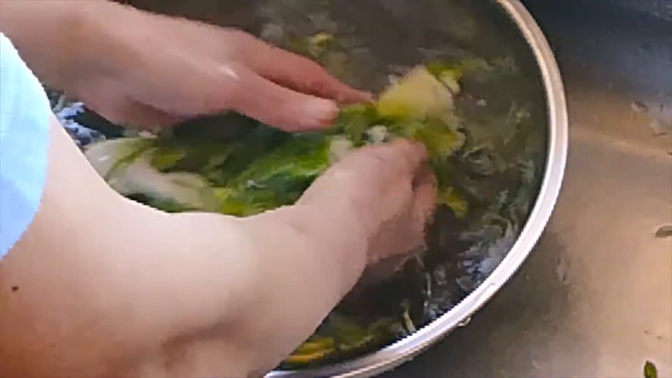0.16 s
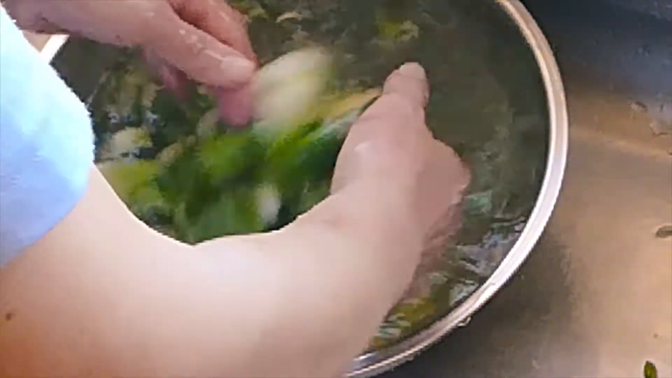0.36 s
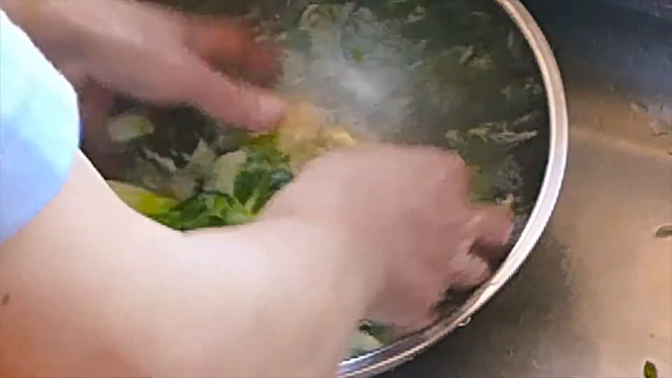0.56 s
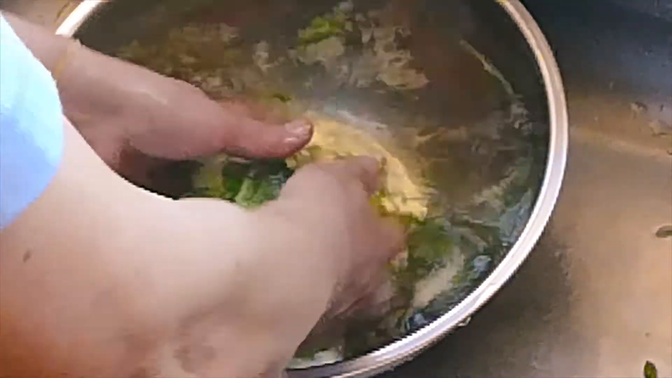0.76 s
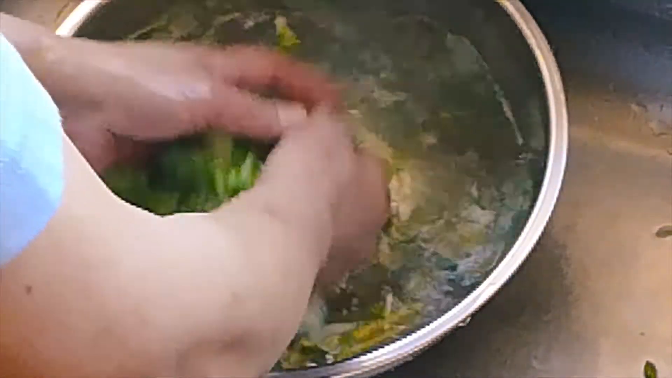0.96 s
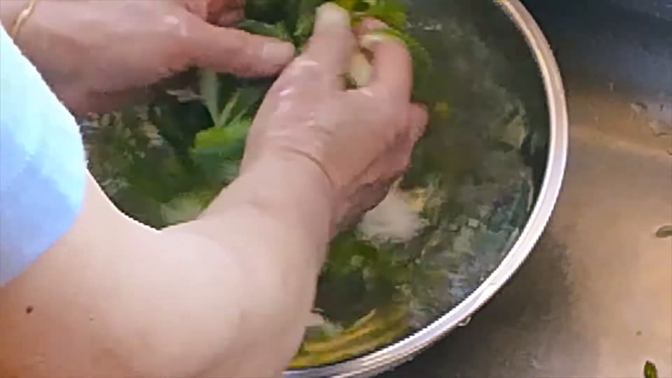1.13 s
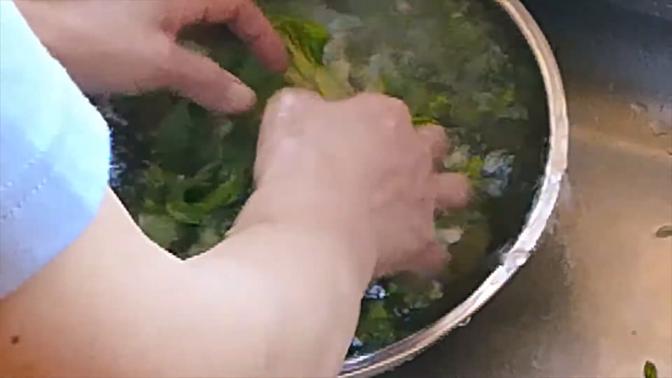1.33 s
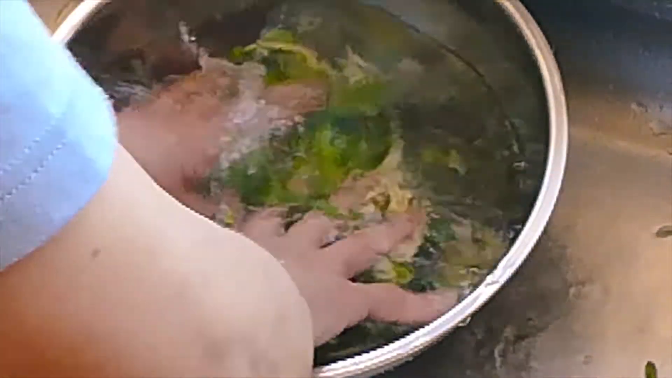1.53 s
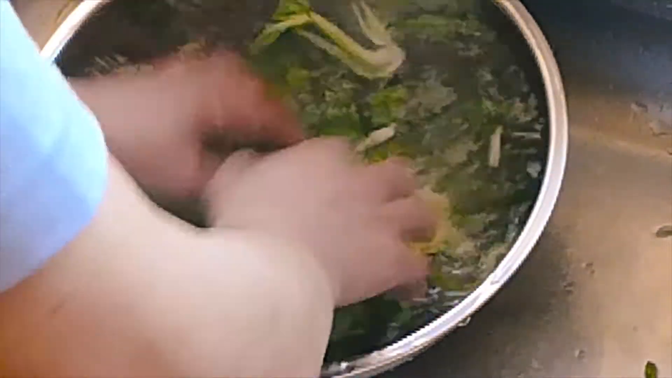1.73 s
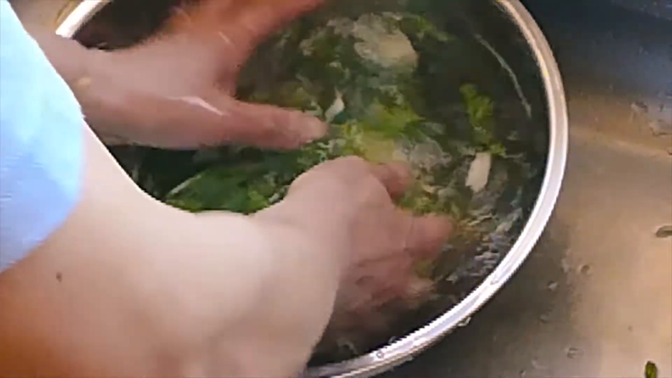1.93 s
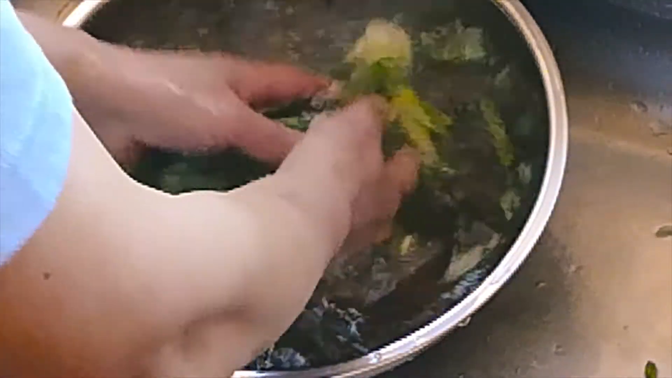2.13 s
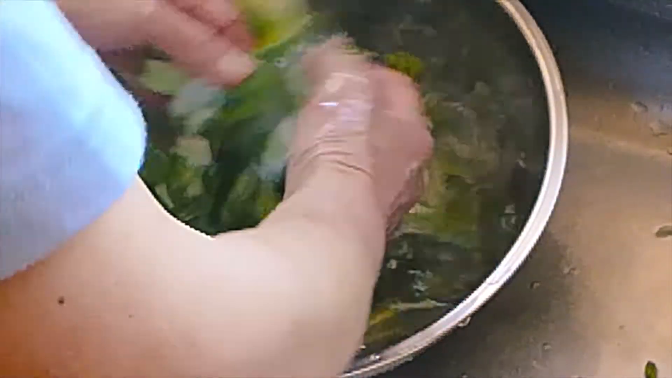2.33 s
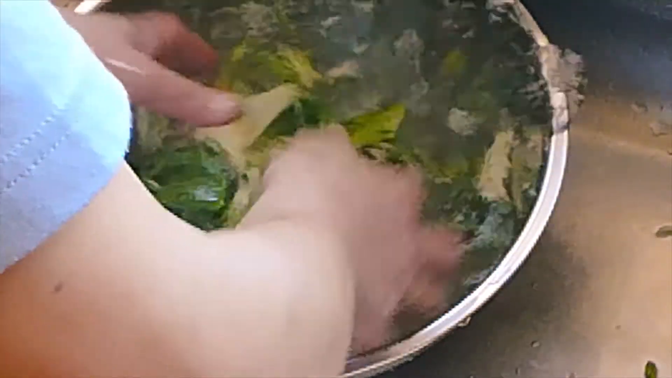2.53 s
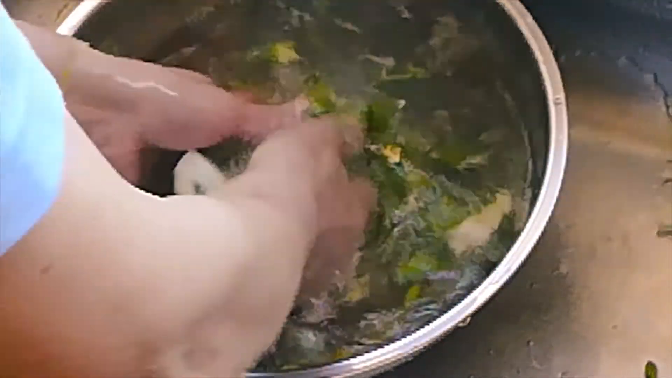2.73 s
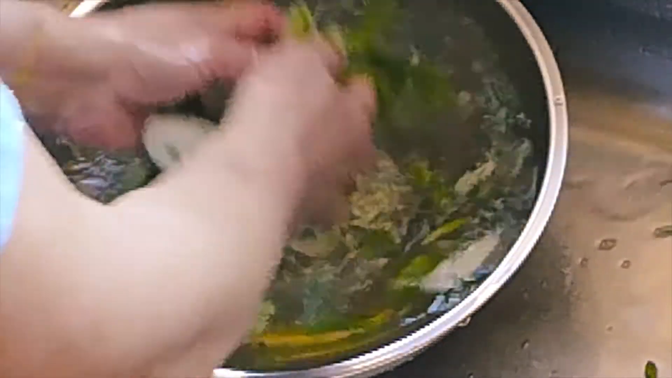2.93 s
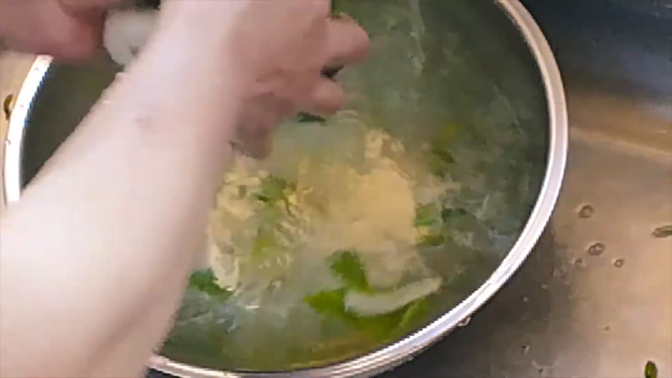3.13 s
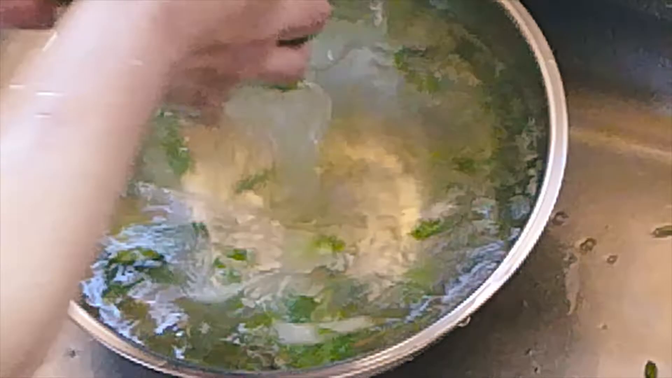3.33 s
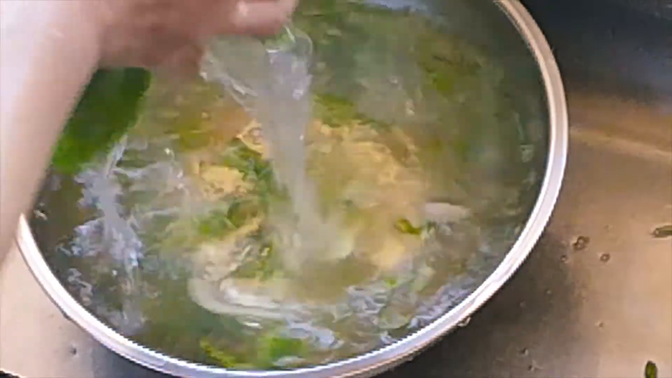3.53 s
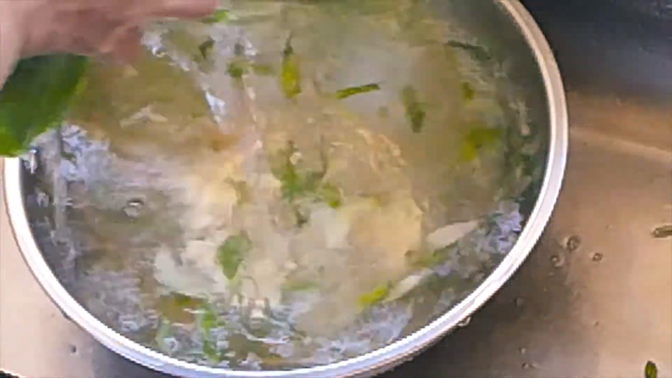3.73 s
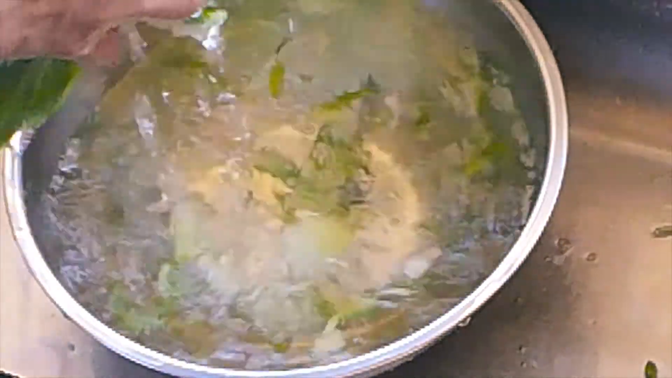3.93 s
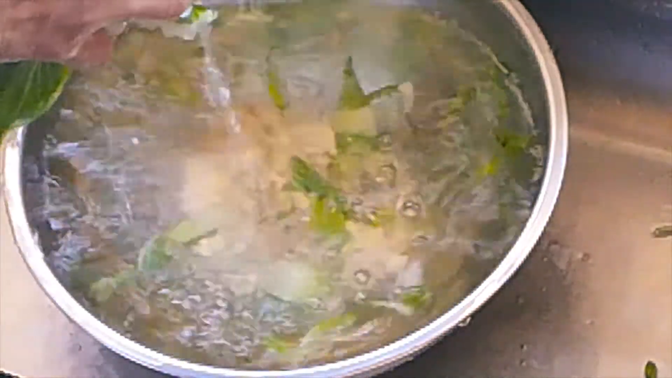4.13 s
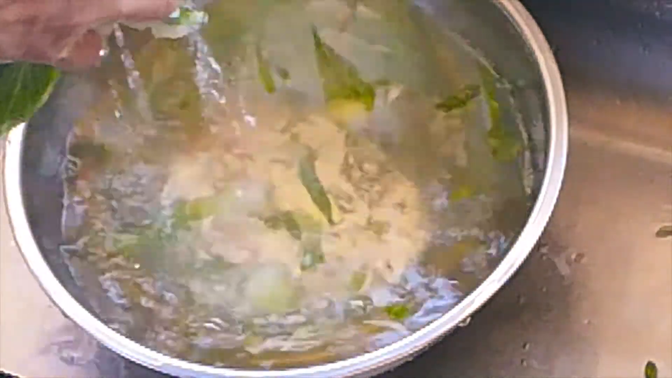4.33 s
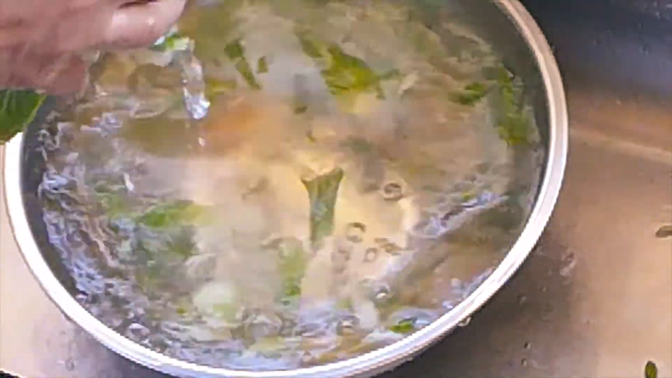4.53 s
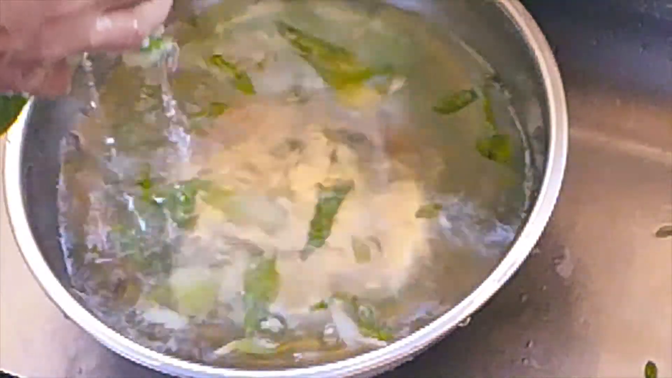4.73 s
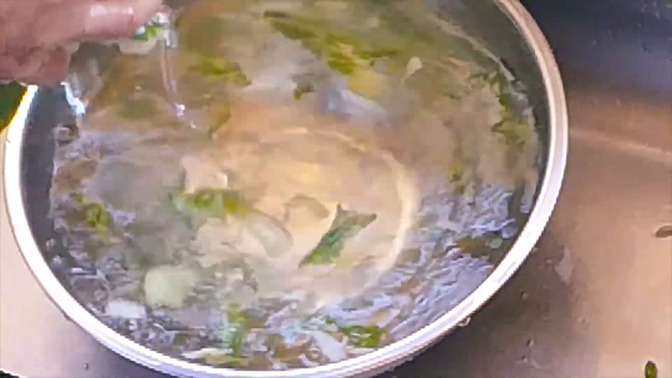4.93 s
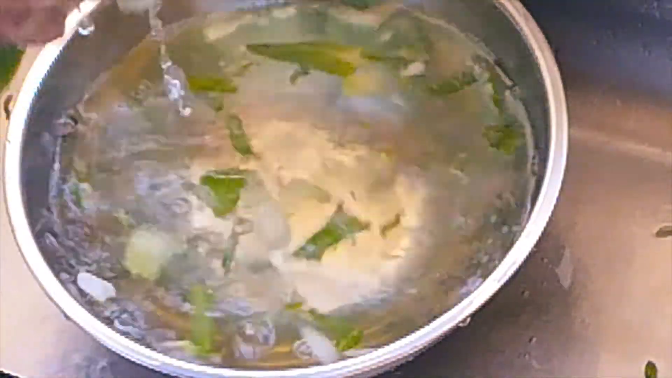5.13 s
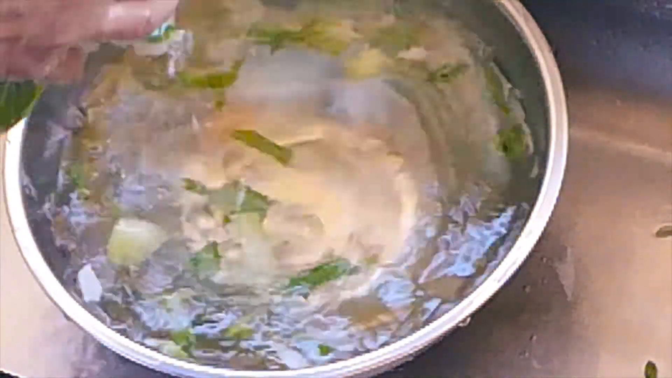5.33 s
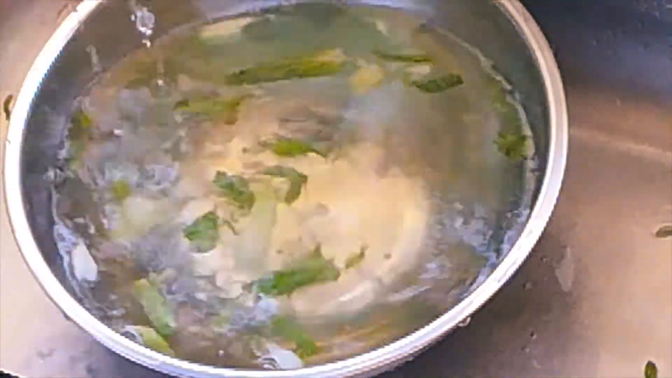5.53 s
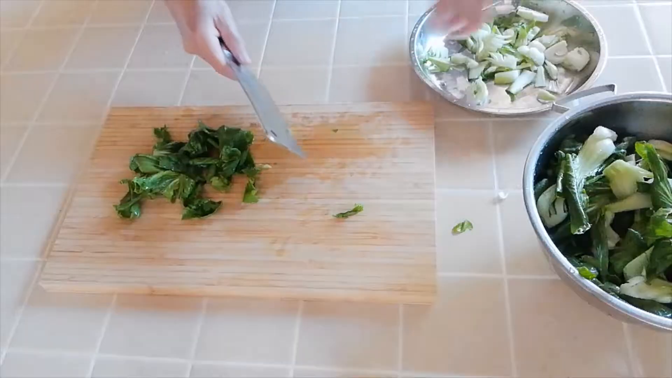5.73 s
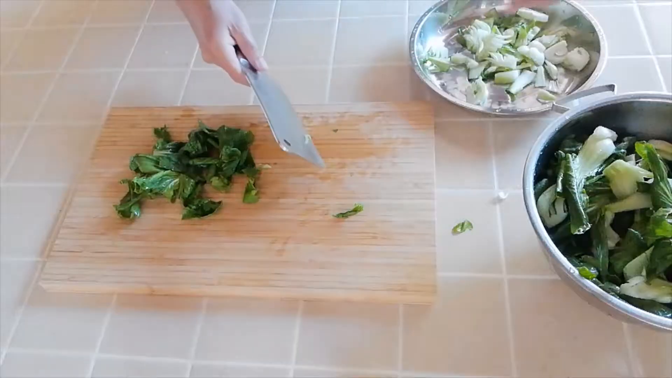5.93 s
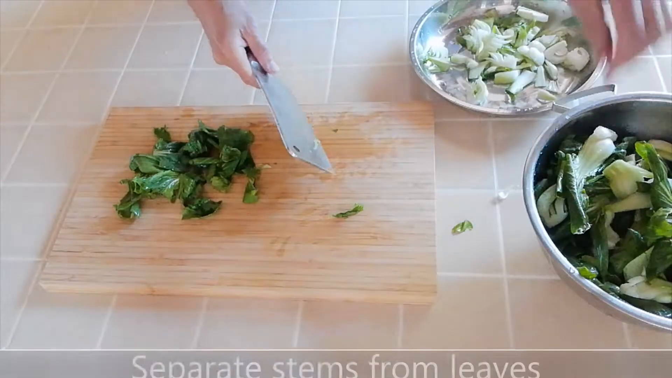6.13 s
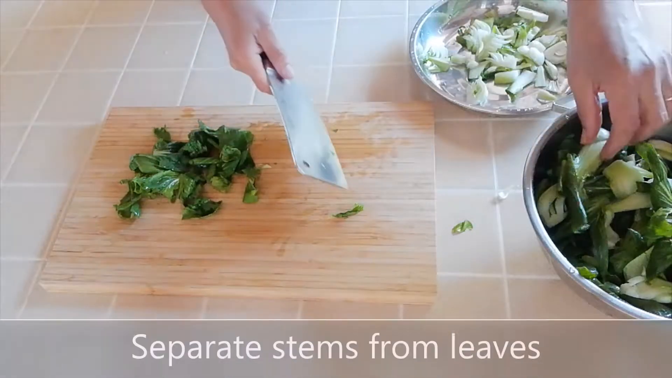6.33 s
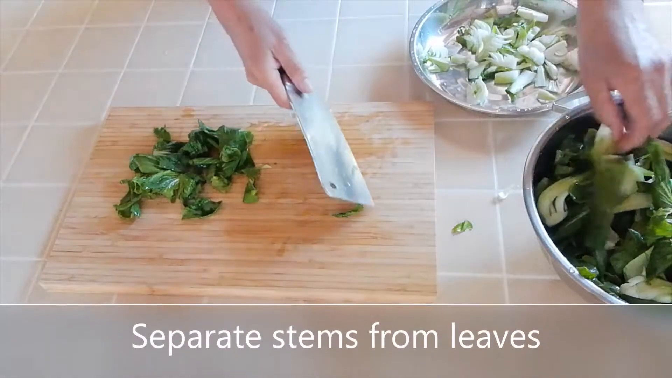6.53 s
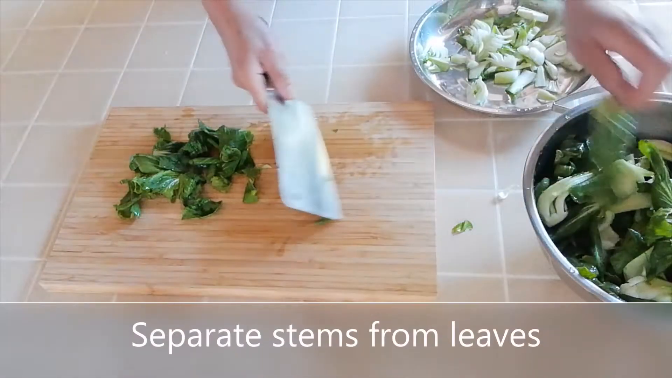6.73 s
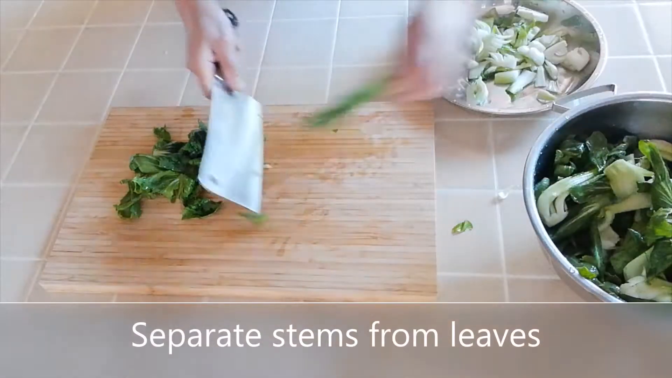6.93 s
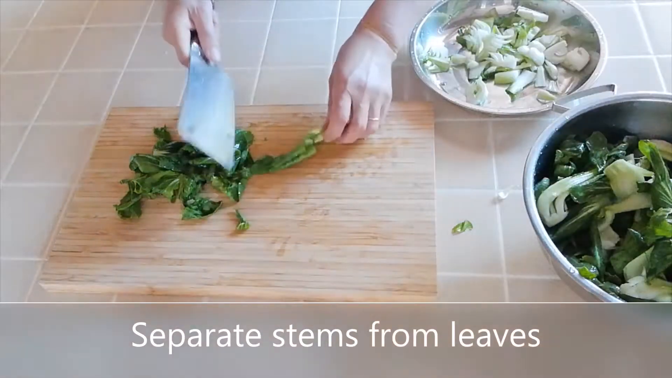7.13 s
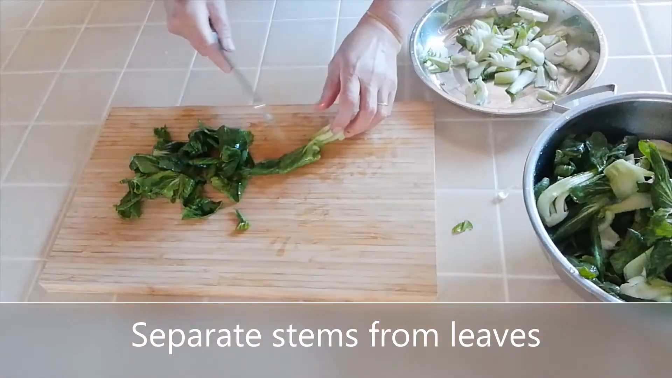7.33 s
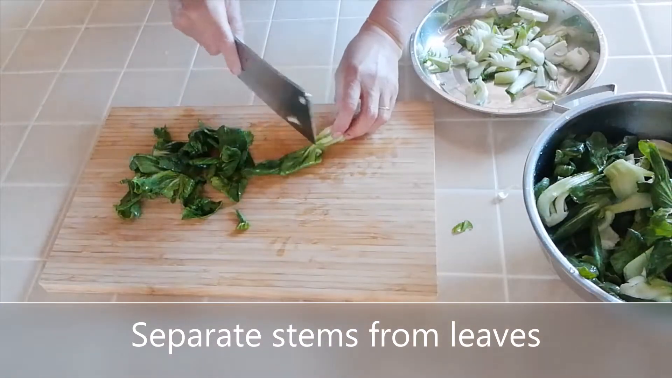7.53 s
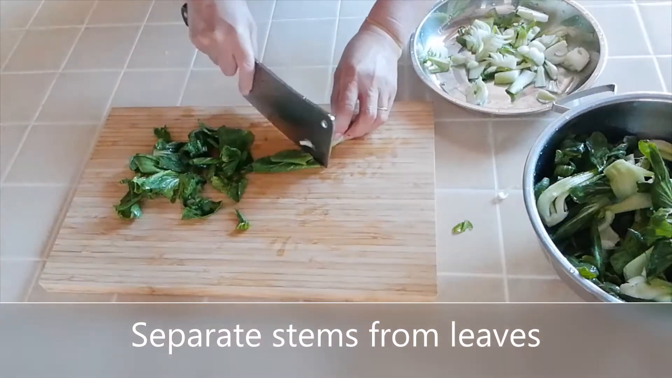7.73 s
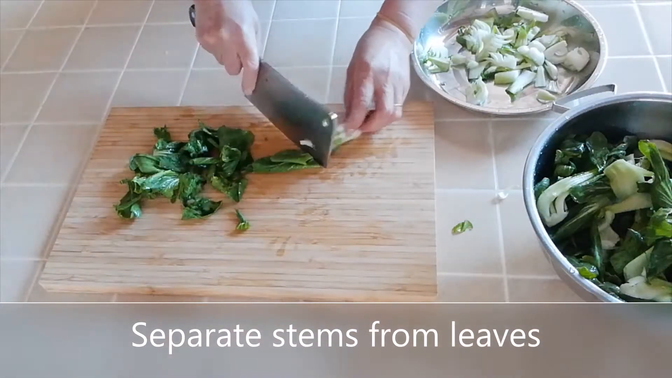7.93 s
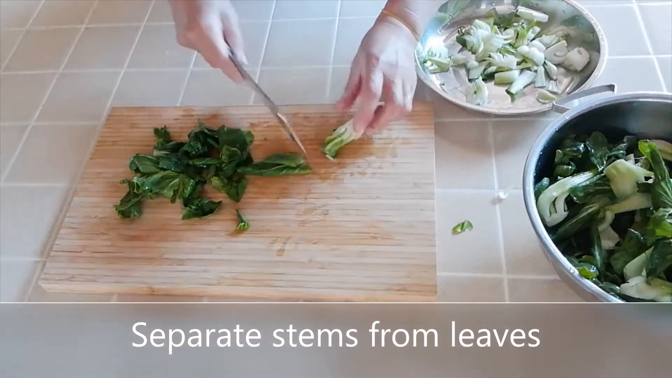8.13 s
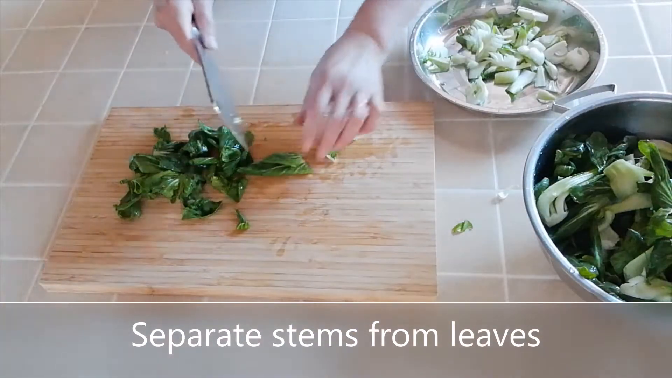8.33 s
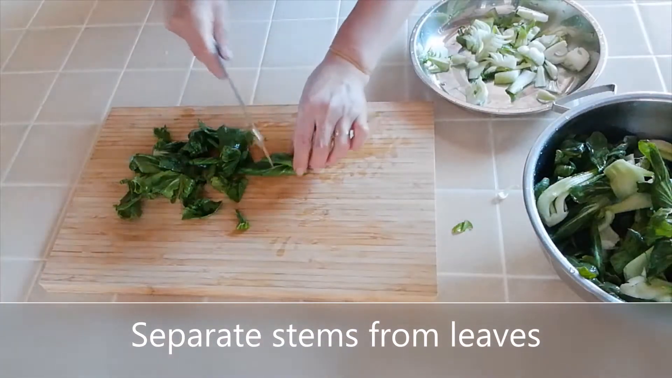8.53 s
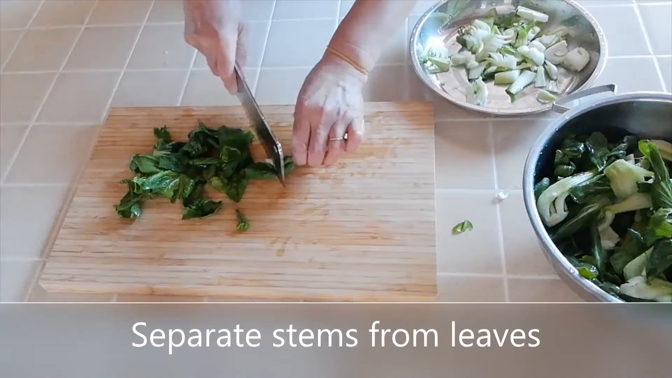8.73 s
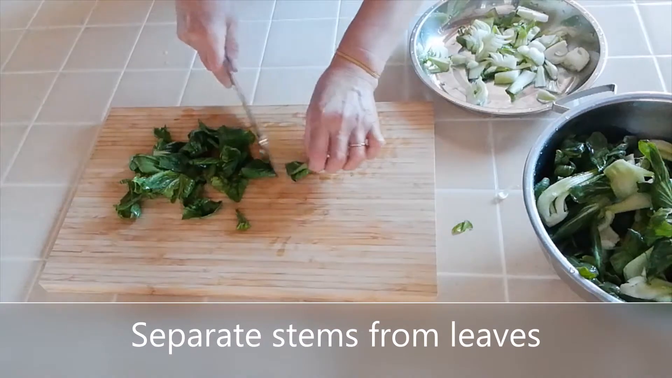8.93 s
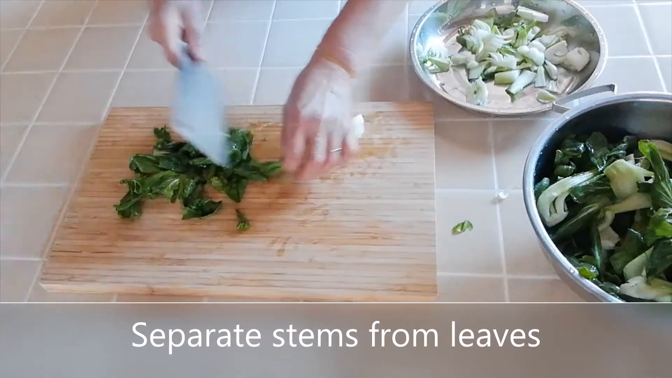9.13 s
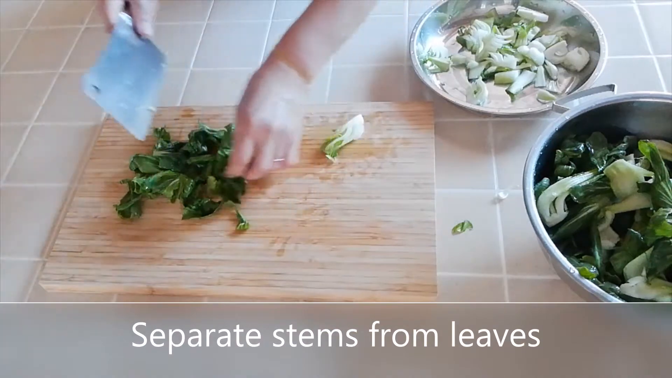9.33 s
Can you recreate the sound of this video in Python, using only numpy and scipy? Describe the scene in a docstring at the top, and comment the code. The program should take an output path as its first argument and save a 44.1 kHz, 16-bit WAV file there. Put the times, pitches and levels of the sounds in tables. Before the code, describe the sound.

For nearly six seconds, water swishes, splashes and bubbles close by in a metal bowl, first stirred by hands, then pouring off lifted leaves in surges, ending in single drops. Then the water stops suddenly. In a quiet, reflective kitchen, a bowl rings softly, leaves rustle, a blade brushes wood, and two hard chops land on a board, the first with a bright vegetable crunch, the second duller and heavier.

```python
"""Washing and chopping greens

Hands swish leafy greens in a steel bowl of water, lift them, and streams and single drips run off: swarms
of short ringing bubbles, clicks and shaped noise. Then, at a quiet kitchen counter, a stalk leaves a bowl,
a cleaver brushes the wooden board and chops twice through the crisp stem: decaying modes and crackle.
Random near echoes and a banded tail make the hard room."""
import sys
import numpy as np
from scipy import signal
from scipy.fft import rfft, irfft, next_fast_len
from scipy.io import wavfile

SR = 44100
rng = np.random.default_rng(int(sys.argv[2]) if len(sys.argv) > 2 else 0)


def waveform_to_disk(signal):
    """Save audio, clipped to [-1, 1], as 16-bit WAV at the path in sys.argv[1]."""
    frames = np.transpose(np.atleast_2d(signal))
    scaled = np.clip(frames, -1, 1) * 32767
    samples = np.round(scaled).astype(np.int16)
    wavfile.write(sys.argv[1], SR, samples)


N = 417617
TIME = np.arange(N) / SR

# All table levels are relative. Spectra: f/Hz, density/dB per Hz.
# gurgling bubbles, spray, low sloshing: f/Hz, density/dB per Hz
GURGLE_SPECTRUM = [(400, -32), (600, -11), (750, -6), (1100, -3.5), (1500, -1.5), (2000, -6), (2800, -13),
                   (4500, -22.5)]
SPRAY_SPECTRUM = [(1200, -15.5), (2200, -2.5), (3500, 3), (5500, 2.5), (7500, -5.5), (10000, -12),
                  (13000, -28.5), (16000, -49)]
SLOSH_SPECTRUM = [(35, -20), (55, 4), (80, -17), (110, -12), (150, 3.5), (240, 3.5), (390, -0.5), (500, -8),
                  (700, -12.5), (1500, -28.5)]
# background at sink and counter: f/Hz, density/dB per Hz
SINK_AIR_SPECTRUM = [(20, -7), (40, -12.5), (56, 5.5), (78, -12), (110, -17), (300, -13), (600, -30.5),
                     (2000, -31.5), (8000, -57.5), (16000, -44)]
COUNTER_AIR_SPECTRUM = [(20, -15.5), (28, -18.5), (40, -2), (58, -1.5), (90, -14), (122, -5.5),
                        (160, -15.5), (250, -15.5), (420, -24.5), (700, -25.5), (1400, -25), (5000, -28.5),
                        (16000, -37.5)]
# wet leaves and snapping fibres: f/Hz, density/dB per Hz
CRISP_SPECTRUM = [(300, -19), (1000, -2), (2400, -1.5), (3800, 1), (5800, 2.5), (8000, -5.5),
                  (11000, -18.5), (16000, -20)]
# fine mist, tick of a splash, edge click on wood, rasp of a rub: f/Hz, gain/dB
MIST_SPECTRUM = [(4000, -22), (9000, -6.5), (13000, 4.5), (16000, -9)]
TICK_SPECTRUM = [(600, -13), (1500, -19), (6000, 11.0), (9000, -9), (16000, -34)]
CLICK_SPECTRUM = [(500, 1), (2500, -1.0), (4000, 2), (8000, -5), (15000, -23.5)]
RASP_SPECTRUM = [(500, -28), (1100, -3), (2000, -11), (7000, 4), (12000, -23)]
# strokes of the hands: peak t/s, spray level/dB, rise/s, fall/s, gurgle re spray/dB
SWISHES = [(0.0, -45, 0.15, 0.15, -6), (0.059, -54, 0.056, 0.13, 5.5), (0.52, -57, 0.45, 0.57, -9),
           (0.77, -52, 0.22, 0.15, -5), (1.11, -50, 0.19, 0.27, -8), (1.2, -42, .012, 0.098, 3.5),
           (1.254, -44, 0.13, 0.26, -4.5), (1.499, -36.5, 0.036, 0.15, -3.5), (1.78, -51, 0.016, 0.11, -4),
           (1.841, -47.5, 0.055, .12, -21), (2.05, -49, 0.17, 0.33, -8), (2.47, -44.5, 0.32, 0.21, -2),
           (2.72, -53.5, 0.043, 0.15, -1), (2.96, -52.5, 0.24, 0.89, -8.5)]
# water off the lifted leaves, gushing, surging as they are squeezed, thinning: t/s, flow level/dB
DRAIN_FLOW = [(2.95, -77), (3.12, -54), (3.36, -41), (3.56, -50.5), (3.8, -42.5), (4.06, -62), (4.18, -50),
              (4.46, -72), (4.69, -55.5), (4.86, -71.5), (5.66, -74)]
# thick gushes plunging into the bowl: peak t/s, level/dB, rise/s, fall/s
PLUNGES = [(3.471, -48, 0.19, 0.17), (3.76, -42, 0.16, 0.12)]
# hands and gushes slap the water: t/s, level/dB, centre f/Hz, left re right/dB
SLAPS = [(0.0476, -37, 2600, -4.5), (0.141, -35, 4940, 2), (0.4494, -39.5, 4420, -8.5),
         (0.6498, -43, 3190, -21.5), (1.053, -27.5, 6650, -4), (1.1941, -26, 5870, -3),
         (1.2501, -30, 5070, -2), (1.3244, -29, 4070, -2), (1.4839, -23.5, 4580, -10),
         (1.4957, -21.5, 4840, -2), (1.5165, -19, 3030, -3), (1.7738, -39, 2650, -12),
         (1.9553, -33.5, 3910, -7.5), (1.9824, -34, 5500, -10), (2.0073, -23.5, 5260, -3.5),
         (2.0446, -31, 4520, -9), (2.2762, -38.5, 7000, -9), (2.4822, -24, 4180, -3.0),
         (2.6623, -35, 6100, -8), (2.6889, -32, 5900, -8), (3.1792, -33.5, 6540, -8),
         (3.2923, -31.5, 2930, -8), (3.3352, -26, 2810, -9), (3.5912, -23.5, 4030, -3),
         (3.7466, -22, 4400, -3.5), (3.8462, -24, 4680, -4.0), (3.913, -26.5, 3830, -4.5),
         (3.9501, -22.5, 3380, -5.5)]
# drops off the leaves: t/s, level/dB, centre f/Hz, left re right/dB
DROPS = [(3.9943, -21.5, 3960, -2.5), (4.0204, -22.5, 7000, -2.5), (4.1116, -24, 5940, -4.5),
         (4.146, -27, 5300, -7), (4.1784, -23.5, 5200, -2), (4.2463, -30, 3370, -9),
         (4.34, -29.5, 9200, -2), (4.5306, -30, 4350, -8), (4.557, -24, 4900, -2), (4.573, -23, 4030, -5.5),
         (4.61, -29, 7800, -5), (4.653, -24.5, 5280, 0), (4.7099, -22.5, 5340, -1.5),
         (4.769, -29.5, 4480, -4), (5.002, -34, 6700, -3), (5.1248, -34, 4800, -7),
         (5.24, -27.5, 4310, -3.5), (5.4003, -28.5, 5540, 0), (5.5398, -21, 4260, -3.5)]
# large ringing air bubbles: t/s, f/Hz, level/dB, pitch rise per ring time/share
LARGE_BUBBLES = [(0.052, 1310, -35.5, .02), (0.145, 1074, -44, 0.023), (0.276, 990, -44, .02),
                 (0.689, 3110, -35.5, .02), (1.116, 1087, -37.5, .02), (1.193, 1132, -27.5, 0.03),
                 (1.194, 1930, -27.5, 0.022), (1.285, 1390, -31.5, 0.029), (1.535, 1227, -27.5, 0.017),
                 (1.627, 690, -38.5, 0.024), (1.775, 927, -38.5, 0.052), (1.79, 1767, -35, .02),
                 (1.956, 1310, -45.5, 0.016), (1.987, 1150, -38.5, .02), (2.063, 962, -37.5, 0.025),
                 (2.069, 3170, -32, .02), (2.13, 1030, -35.5, .03), (2.276, 1540, -27.5, 0.016),
                 (2.398, 1570, -33, 0.025), (2.767, 1200, -48, .03), (2.893, 1236, -39.5, 0.032),
                 (3.135, 1292, -37, 0.017), (3.211, 2010, -32.5, .03), (3.239, 2080, -35, 0.018),
                 (3.447, 671, -37.5, 0.015), (3.583, 1692, -30, 0.015), (3.913, 1261, -25.5, 0.01),
                 (3.949, 1190, -33.5, .02), (4.2, 1054, -45.5, 0.127), (4.711, 2720, -36, 0.018),
                 (4.77, 2650, -45, .02), (4.815, 1295, -34.5, 0.011), (4.91, 945, -46, 0.014),
                 (4.937, 1016, -49.5, 0.14), (5.127, 1854, -31, 0.014), (5.146, 3330, -39, 0.015),
                 (5.201, 2010, -40.5, 0.017), (5.574, 1250, -43, 0.017), (5.631, 1380, -48.5, 0.12)]
# fingers and stalk brush the vegetable bowl: t/s, level/dB
BOWL_BRUSH = [(6.24, -82), (6.275, -46.5), (6.295, -55.5), (6.32, -60.5), (6.4, -85)]
# ring of that bowl: f/Hz, level/dB, t60/s
BOWL_MODES = [(1062, -1.5, .14), (1194, -6, .2), (1292, -5, 0.18), (1447, -11, 0.3), (1870, -20, 0.14),
              (1615, -10, 0.6), (2212, 3.5, 0.55), (2880, -10, 0.38), (3040, -19, .4), (4240, -12, 0.45),
              (5840, -17, 0.092), (6700, -17, 0.069), (7160, -8.5, 0.049)]
# leaves rub, stem fibres tear (fetch, lay down, cut, push aside): peak t/s, level/dB, rise/s, fall/s
RUSTLES = [(6.29, -71, 0.051, 0.9), (6.52, -64, 0.24, 0.094), (6.66, -63, .12, 0.057),
           (7.1, -67.5, .08, 0.12), (7.673, -41, 0.013, 0.063), (7.71, -54.5, 0.045, 0.24),
           (7.819, -53, 0.045, 0.036), (8.614, -52.5, 0.031, 0.15), (8.909, -57.5, 0.12, 0.064),
           (9.03, -67, 0.083, .1), (9.29, -73, 0.39, 0.33)]
# single fibres snap: t/s, level/dB
SNAPS = [(6.4522, -45), (6.4947, -48), (6.5244, -71), (6.5485, -54), (7.053, -47), (7.092, -36.5),
         (7.6501, -40), (7.673, -12), (7.688, -19.5), (7.816, -25), (8.809, -36.5), (8.9154, -36.5),
         (8.945, -42), (9.071, -46), (9.1095, -46.5), (9.141, -46)]
# blade slides along the board: t/s, level/dB
BLADE_SLIDE = [(6.572, -74), (6.58, -57), (6.6, -70), (6.635, -55.5), (6.675, -56.5), (6.695, -76),
               (6.74, -88), (6.77, -97)]
# ring of the blade: f/Hz, level/dB, t60/s
BLADE_MODES = [(2934, -4, 0.11), (3680, 5, 0.13), (3750, 5, 0.14), (4420, -13, 0.088), (4720, -2, 0.11),
               (5840, -19, 0.13), (5840, -9, 0.14), (6160, 1, 0.11), (7420, -6, 0.1), (8020, -1.5, .12),
               (8630, 0, 0.1), (9000, -1, .14), (9870, -8, .12)]
# knocks and chops: t/s, level/dB, hardness/treble dB per octave, thud/bass dB per octave, edge click/dB
CHOPS = [(6.5776, -35.5, 5, 6.5, -21), (6.6, -49.5, -12, 15, -25), (6.64, -52, 0, 10, -25),
         (7.09, -61, 21.5, 10, -10.5), (7.13, -67.5, -7.5, 17, -26.5), (7.6761, -9, 0.5, -3.5, -28.5),
         (8.6108, -6, -8.5, -11.5, -13.5)]
# wooden board: f/Hz, level/dB, t60/s
BOARD_MODES = [(62, -27, .25), (122, -26.5, 0.097), (200, -24.5, 0.033), (273, -22, 0.031),
               (420, -24.5, 0.041), (674, -38.5, 0.022), (800, -23, 0.023), (975, -12.5, 0.045),
               (1030, -9, 0.015), (1123, -13, 0.026), (1480, -9, 0.0052), (1860, -7.5, 0.011),
               (2060, -16.5, 0.0094), (2650, -23.5, 0.013)]
# left-right likeness of diffuse sound: f/Hz, likeness/0-1
LIKENESS = [(60, 0.93), (130, 0.97), (300, 0.57), (640, 0), (1400, .25), (3000, .05), (16000, 0)]
# kitchen decay: f/Hz, t60/s
ROOM_T60 = [(100, .5), (300, .56), (1000, .56), (2000, .62), (5000, .62), (8000, .56), (14000, .44)]
# kitchen tail colour: f/Hz, gain/dB
ROOM_COLOUR = [(60, 1), (220, 9.5), (400, 1.5), (520, -3.5), (750, 3.5), (1000, 1.5), (2000, -2.5),
               (5000, -3), (14000, 2)]

WASH_END_S, COUNTER_START_S = 5.675, 5.7
SINK_AIR_DB, COUNTER_AIR_DB = -59.5, -68
HUM_HZ, HUM_DB = 120, -75.5
SWELL_DB = 20.5  # climb per rise time, drop per fall time
FULL_FLOW_DB, FULL_GURGLE_DB, GURGLE_POWER = -42.5, -45.5, 1.9  # a thinner stream traps far less air
LAP_SPRAY_DB, LAP_GURGLE_DB = -79, -76.5  # the water never quite rests
SLOSH_DB, SLOSH_WAVER_DB, SETTLE_S, SETTLE_DB_PER_S = -58, -0.3, 4.0, 1  # calms once the hands are out
SLAPS_DB, DROPS_DB, TICK_DB = 6, 2, -12  # all slaps, all drops, tick within each splash
BAND_LIMIT_HZ = 15900
# high-pass: keeps the knocks' abrupt starts from booming below 95 Hz
DEEP_CUT = signal.butter(2, 95, "high", fs=SR, output="sos")


def gain_of(db):
    """Decibels to amplitude."""
    return 10 ** (np.asarray(db) / 20)


def evened(x):
    """Scales to rms 1."""
    return x / np.sqrt(np.mean(x ** 2) + 1e-20)


def read(points, hz):
    """Interpolates (Hz, value) rows on a log-frequency axis."""
    f, value = np.transpose(points)
    return np.interp(np.log(hz + 1), np.log(f + 1), value)


def level(rows):
    """Interpolates (s, dB) rows to a gain per sample."""
    return gain_of(np.interp(TIME, *np.transpose(rows)))


def panned(db):
    """Left and right gains for a level difference."""
    return gain_of([[db / 2], [-db / 2]])


def add(mix, s, sound):
    """Mixes a sound in at time s, cut at the end of the mix."""
    part = mix[..., max(round(s * SR), 0):][..., :sound.shape[-1]]
    part += sound[..., :part.shape[-1]]


def coloured(x, points):
    """Filters by a dB curve, then scales to rms 1."""
    length = x.shape[-1]
    size = next_fast_len(length)
    gains = gain_of(read(points, np.fft.rfftfreq(size, 1 / SR)))
    return evened(irfft(rfft(x, size) * gains, size)[..., :length])


def diffuse(pair):
    """Mixes two unrelated signals per band to the likeness of diffuse sound: most alike in the bass."""
    length = pair.shape[-1]
    size = next_fast_len(length)
    a, b = rfft(pair, size)
    same = np.clip(read(LIKENESS, np.fft.rfftfreq(size, 1 / SR)), -1, 1)
    right = same * a + np.sqrt(1 - same ** 2) * b
    return irfft(np.array([a, right]), size)[:, :length]


def air(points):
    """Steady diffuse noise."""
    return coloured(diffuse(rng.standard_normal((2, N))), points)


def clicks(per_s, spread_db):
    """Random clicks of random sign, most small and a few large."""
    out = np.zeros(N)
    at = np.flatnonzero(rng.random(N) < per_s / SR)
    size_db = spread_db * np.minimum(rng.exponential(1, len(at)), 4)
    out[at] = rng.choice([-1, 1], len(at)) * gain_of(size_db)
    return out


def wander(knots_per_s):
    """A random curve of rms 1, straight between knots."""
    knots = rng.standard_normal(int(N / SR * knots_per_s) + 2)
    return evened(np.interp(TIME * knots_per_s, np.arange(len(knots)), knots))


def swell(peak_s, db, rise_s, fall_s):
    """Gain of one stroke: grows to its peak and dies away, linear in dB."""
    return gain_of(db - SWELL_DB * np.maximum((peak_s - TIME) / rise_s, (TIME - peak_s) / fall_s))


def together(gains):
    """Unrelated sounds add in power."""
    return np.sqrt(sum(gain ** 2 for gain in gains))


def through(x, response):
    """Convolves with a two-channel response."""
    return signal.oaconvolve(np.atleast_2d(x) * np.ones((2, 1)), response, axes=1)[:, :N]


def reflections(t60_s, gap_s):
    """Quick sparse echoes off nearby surfaces, energy 1 per ear, different at each."""
    t = np.arange(SR // 6) / SR
    signs = rng.choice([-1., 1.], (2, len(t)))
    sparse = signs * (rng.random((2, len(t))) < .15)
    taps = diffuse(sparse) * (t > gap_s) * gain_of(-60 * t / t60_s)
    return taps / np.linalg.norm(taps, axis=1, keepdims=True)


def shifting_echoes(x, t60_s, gap_s, count=3):
    """As the hands move, the sound passes from one set of near echoes to the next, 2.3 rounds per s."""
    shares = np.maximum(np.cos(2 * np.pi * (2.3 * TIME - np.arange(count)[:, None] / count)), 0)
    shares /= np.linalg.norm(shares, axis=0)
    return sum(through(x * share, reflections(t60_s, gap_s)) for share in shares)


def room(x, build_s):
    """The kitchen's tail: noise that builds up, then each band dies at its own speed."""
    hz, t, z = signal.stft(diffuse(rng.standard_normal((2, SR))), SR, nperseg=256)
    z = z * gain_of(-60 * t / read(ROOM_T60, hz)[:, None]) * (1 - np.exp(-t / build_s))
    plain = signal.istft(z, SR)[1]
    tail = signal.istft(z * gain_of(read(ROOM_COLOUR, hz))[:, None], SR)[1]
    return through(x, tail / np.linalg.norm(plain[0]))


def sloshing():
    """Low rocking of the water, deepened by each plunging gush."""
    settle_db = SETTLE_DB_PER_S * np.maximum(TIME - SETTLE_S, 0)
    rocking = gain_of(SLOSH_DB + SLOSH_WAVER_DB * wander(7.3) - settle_db)
    return air(SLOSH_SPECTRUM) * together([rocking] + [swell(*row) for row in PLUNGES])


def bubble(hz, cycles, rise, onset_cycles):
    """A bubble rings, to 1/e in some cycles, its pitch rising as it nears the surface."""
    age = np.arange(int(5 * cycles * SR / hz) + 2) * hz / SR  # in cycles
    tone = np.sin(2 * np.pi * age * (1 + rise * age / cycles / 2))
    return tone * np.exp(-age / cycles) * (1 - np.exp(-age / onset_cycles))


def swarm(low_hz, high_hz, per_s, spread_db, cycles, count):
    """Bubbles of many sizes, each size from its own place in the bowl."""
    out = np.zeros((2, N))
    for hz in np.geomspace(low_hz, high_hz, count):
        ring = bubble(hz, cycles, rise=0.04, onset_cycles=0.97)
        train = signal.oaconvolve(clicks(per_s / count, spread_db), ring)[:N] * hz
        pan = panned(rng.normal(0, 3))
        out += pan * np.array([train, np.roll(train, rng.integers(-12, 13))])
    return out


def agitation():
    """How strongly hands and draining water raise spray, and how much air they trap."""
    flow = level(DRAIN_FLOW)
    drain_gurgle = gain_of(FULL_GURGLE_DB) * (flow / gain_of(FULL_FLOW_DB)) ** GURGLE_POWER
    spray = [flow, gain_of(LAP_SPRAY_DB)]
    gurgle = [drain_gurgle, gain_of(LAP_GURGLE_DB)]
    for s, db, rise_s, fall_s, gurgle_db in SWISHES:
        stroke = swell(s, db, rise_s, fall_s)
        spray.append(stroke)
        gurgle.append(stroke * gain_of(gurgle_db))
    return together(spray), together(gurgle)


def stirring():
    """Bubbles gurgle, spray fizzes in quick clumps; stronger stirring throws off disproportionately more mist."""
    gurgle = coloured(swarm(560, 2600, per_s=480, spread_db=2.6, cycles=5.5, count=40), GURGLE_SPECTRUM)
    spray = coloured(swarm(1900, 15000, per_s=2800, spread_db=4, cycles=4.5, count=40), SPRAY_SPECTRUM)
    force, trapped_air = agitation()
    clumps = gain_of(2 * wander(45))
    specks = clicks(1500, spread_db=6)
    mist = coloured(rng.standard_normal((2, N)) + .8 * specks, MIST_SPECTRUM)
    mist = gain_of(-23.0) * mist * force * (force / force.max()) ** 0.32  # grows faster than the force
    gurgle = gain_of(-0.5) * gurgle * trapped_air * panned(-1.3)
    spray = gain_of(-1) * spray * panned(-3.5) * force
    return gurgle + (spray + mist) * clumps


def splashes(rows, scatter, pitch_spread, gap_s, cycles, count=24):
    """Each slap or drop: a tick of impact, one small ringing bubble, a scatter of random ones."""
    out = np.zeros((2, N))
    for s, db, hz, pan_db in rows:
        burst = np.zeros((2, SR // 5))
        for wait, size, side in zip(rng.exponential(1, count), *rng.standard_normal((2, count))):
            pitch_hz = np.clip(hz * np.exp(pitch_spread * size), 600, 14000)
            grain = bubble(pitch_hz, cycles=2.35, rise=0.023, onset_cycles=1.0)
            grain = scatter * grain * np.exp(-.45 * wait)  # later is weaker
            pair = np.array([grain, np.roll(grain, rng.integers(0, 7))])
            add(burst, wait * gap_s, panned(3 * side) * pair)
        first = bubble(hz, cycles, rise=.04, onset_cycles=.8)
        tick = coloured(rng.standard_normal((2, 128)), TICK_SPECTRUM)
        add(burst, 0, 0.39 * first)
        add(burst, 0, gain_of(TICK_DB) * tick * np.exp(-np.arange(128) / 18))
        add(out, s, gain_of(db) * panned(pan_db) * burst)
    return out


def plinks():
    """Trapped air rings with a clear pitch that slides upwards."""
    out = np.zeros((2, N))
    for s, hz, db, rise in LARGE_BUBBLES:
        ring = bubble(hz, cycles=7.0, rise=rise, onset_cycles=0.86)
        add(out, s, gain_of(db) * panned(rng.normal(-1.1, 3)) * ring)
    return out


def sink():
    """The water, echoed by steel bowl and room, over low sloshing and rumble."""
    slaps = splashes(SLAPS, scatter=0.26, pitch_spread=0.314, gap_s=.012, cycles=6.5)
    drops = splashes(DROPS, scatter=0.35, pitch_spread=0.16, gap_s=.009, cycles=6.1)
    water = stirring() + gain_of(SLAPS_DB) * slaps + gain_of(DROPS_DB) * drops + plinks()
    bowl_echo = gain_of(0.5) * shifting_echoes(water, t60_s=0.082, gap_s=.001)
    tail = gain_of(-3.5) * room(water, build_s=0.0057)
    low = gain_of(-2) * sloshing() + gain_of(SINK_AIR_DB) * air(SINK_AIR_SPECTRUM)
    return (water + bowl_echo + tail + low) * np.clip((WASH_END_S - TIME) / 0.032, 0, 1)


def rubbed(stroke, modes, scrape_db):
    """Tiny slips under a stroke rasp and ring a steel object's modes."""
    t = np.arange(SR // 2) / SR
    ring = np.zeros(len(t))
    for hz, db, t60_s in modes:
        tone = np.sin(2 * np.pi * hz * t + rng.uniform(0, 2 * np.pi))
        ring += gain_of(db - 60 * t / t60_s) * tone / np.sqrt(t60_s)
    force = level(stroke) * (TIME > stroke[0][0]) * (TIME < stroke[-1][0])
    slips = evened(clicks(4000, spread_db=0.5)) * force
    # one impulse at the stroke's loudest moment, so the ring is steady
    impulse = np.linalg.norm(force) * (np.arange(N) == np.argmax(force))
    rasp = coloured(slips, RASP_SPECTRUM) * np.std(slips)
    ringing = signal.oaconvolve(0.69 * slips + 0.48 * impulse, ring / np.linalg.norm(ring))[:N]
    return ringing + gain_of(scrape_db) * rasp


def greens():
    """Crackle of wet leaves, clicks in little clumps, and the noise-burst snap of single fibres."""
    crackle = clicks(2600, spread_db=4.5) * gain_of(3 * wander(60))
    out = coloured(crackle, CRISP_SPECTRUM) * together(swell(*row) for row in RUSTLES)
    t = np.arange(600) / SR
    for s, db in SNAPS:
        snap = coloured(rng.standard_normal(len(t)), CRISP_SPECTRUM) * np.exp(-t / 0.00051)
        add(out, s, gain_of(db - 7.5) * snap)
    return out


def chops():
    """The edge clicks on the wood and the board's modes ring; a hard blow is brighter, a flat one thuds."""
    out, t = np.zeros(N), np.arange(SR // 4) / SR
    for s, db, hardness_db, thud_db, click_db in CHOPS:
        wood = 0
        for hz, mode_db, t60_s in BOARD_MODES:
            treble_oct = max(np.log2(hz / 1000), 0)
            bass_oct = max(2 - abs(np.log2(hz / 250)), 0)  # thud centres on 250 Hz
            blow_db = mode_db + hardness_db * treble_oct + thud_db * bass_oct
            wood = wood + gain_of(blow_db - 60 * t / t60_s) * np.sin(2 * np.pi * hz * t)
        click = coloured(rng.standard_normal(len(t)), CLICK_SPECTRUM)
        add(out, s, gain_of(db) * (wood + 0.22 * click * gain_of(click_db - 60 * t / .009)))
    return signal.sosfilt(DEEP_CUT, out)


def counter():
    """Board, blade, bowl and leaves, echoed by worktop and walls, over faint air and mains hum."""
    wood = chops() * panned(-1)
    blade = rubbed(BLADE_SLIDE, BLADE_MODES, scrape_db=-8.0)
    bowl = rubbed(BOWL_BRUSH, BOWL_MODES, scrape_db=-11.5)
    small = (greens() + blade) * panned(-3.5) + bowl * panned(-8.5)
    wall_echo = gain_of(-11) * np.roll(wood, round(.0053 * SR), axis=1)
    near = gain_of(-5.5) * through(wood, reflections(t60_s=0.19, gap_s=0.00096))
    near = near + gain_of(5.5) * shifting_echoes(small, t60_s=0.046, gap_s=0.00037)
    tail = gain_of(-5) * room(wood, build_s=.035) + gain_of(-2.5) * room(small, build_s=0.01)
    hum = gain_of(HUM_DB) * np.sin(2 * np.pi * HUM_HZ * TIME)
    quiet = gain_of(COUNTER_AIR_DB) * air(COUNTER_AIR_SPECTRUM) + hum
    fade_in = np.clip((TIME - COUNTER_START_S) / 0.034, 0, 1)
    return (wood + wall_echo + .8 * small + near + tail + quiet) * fade_in


def scene():
    """First the sink, then the counter."""
    return sink() + counter()


def record(dry):
    """Low-pass at the band limit."""
    low_pass = signal.firwin(511, BAND_LIMIT_HZ, window=("kaiser", 9), fs=SR)
    return signal.oaconvolve(dry, low_pass[None], "same")


dry = scene()
out = record(dry)
waveform_to_disk(out)
```